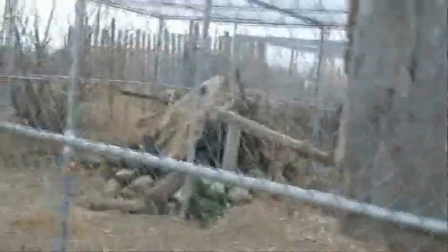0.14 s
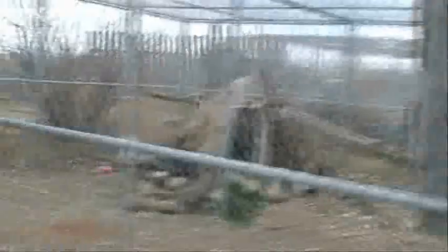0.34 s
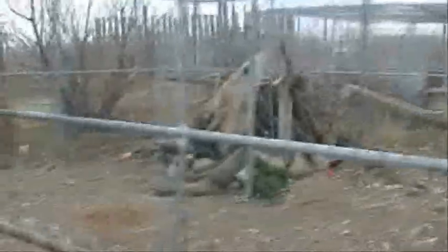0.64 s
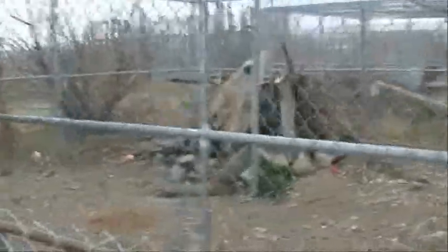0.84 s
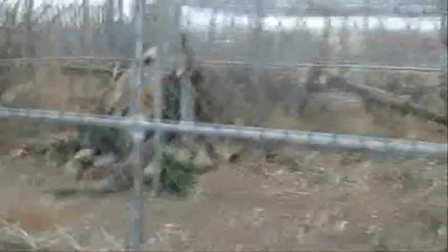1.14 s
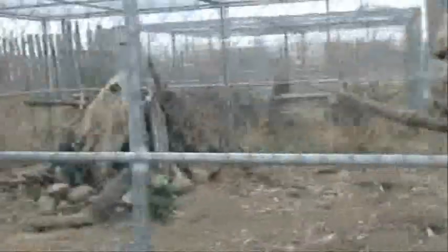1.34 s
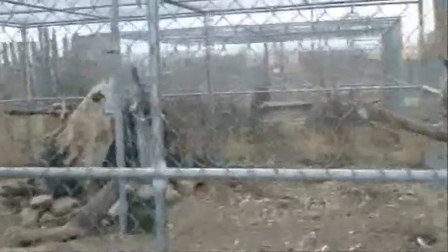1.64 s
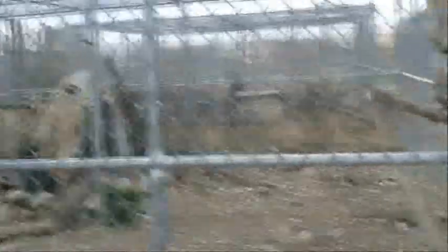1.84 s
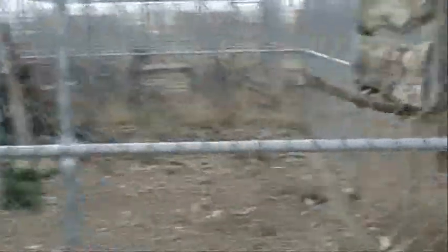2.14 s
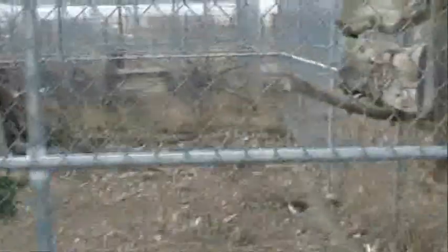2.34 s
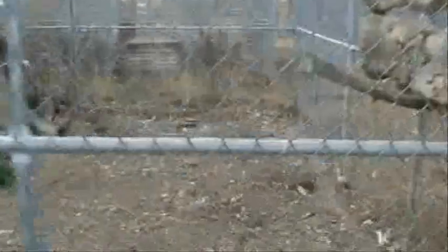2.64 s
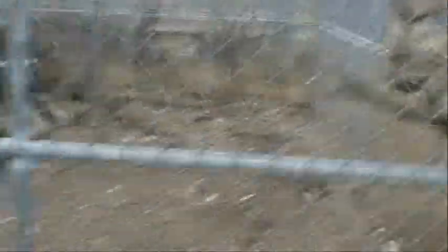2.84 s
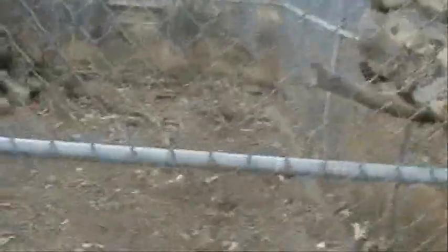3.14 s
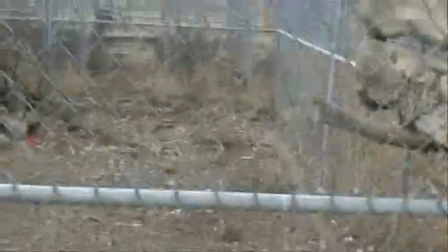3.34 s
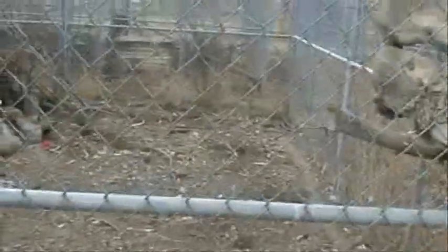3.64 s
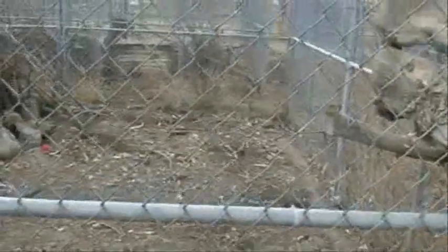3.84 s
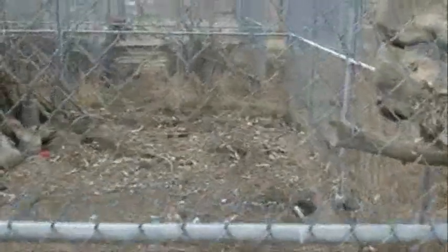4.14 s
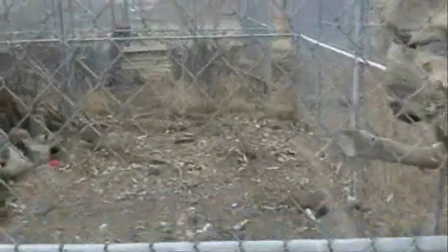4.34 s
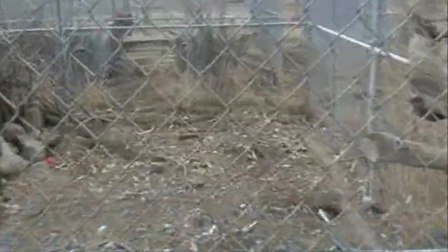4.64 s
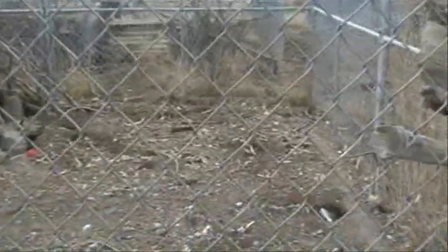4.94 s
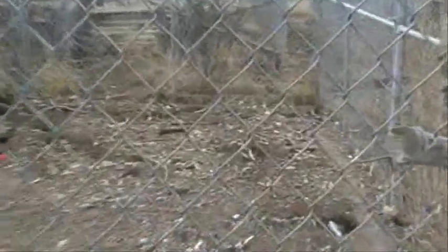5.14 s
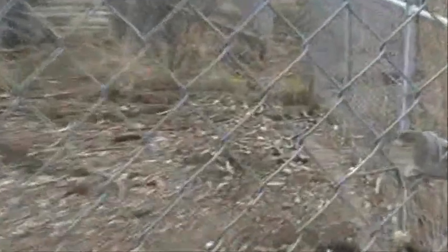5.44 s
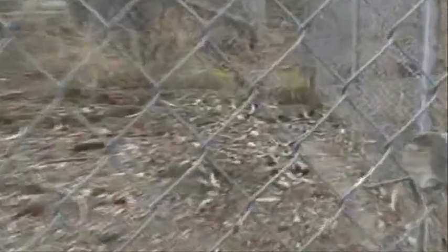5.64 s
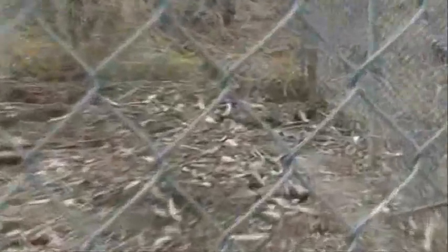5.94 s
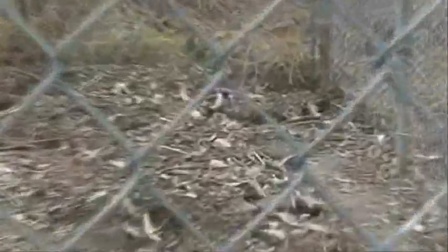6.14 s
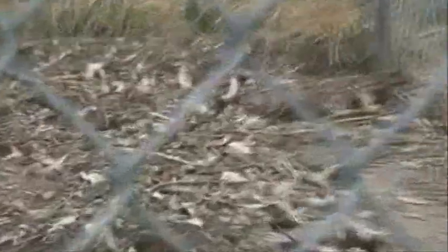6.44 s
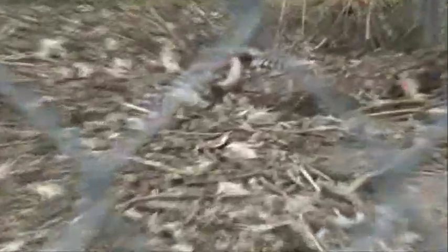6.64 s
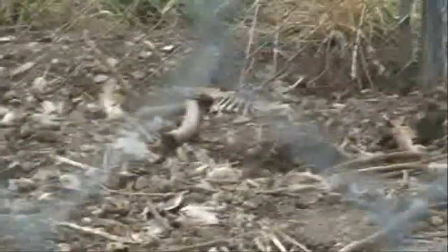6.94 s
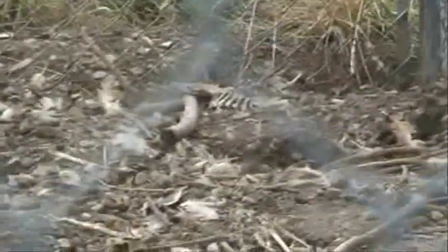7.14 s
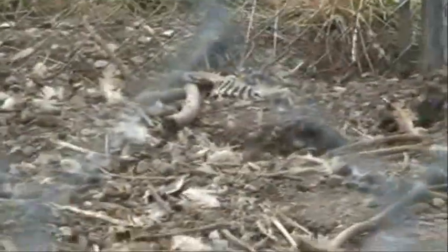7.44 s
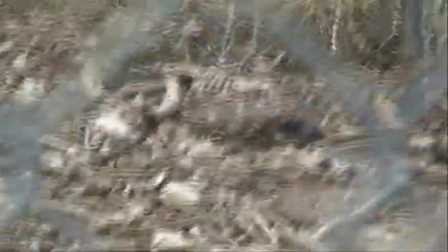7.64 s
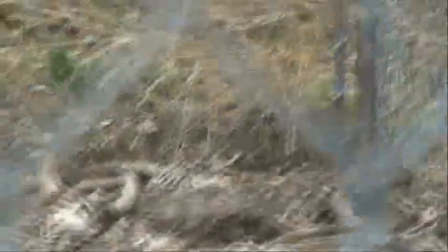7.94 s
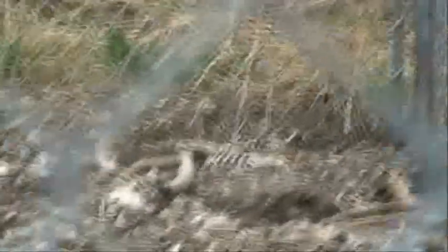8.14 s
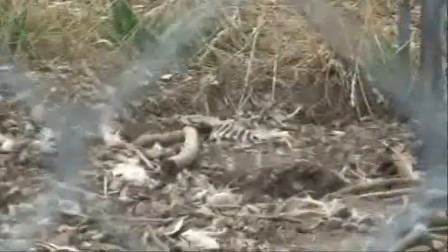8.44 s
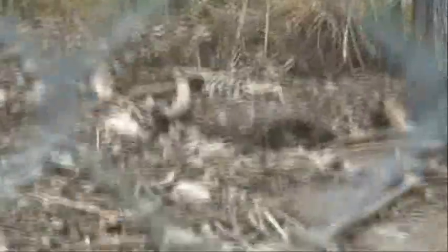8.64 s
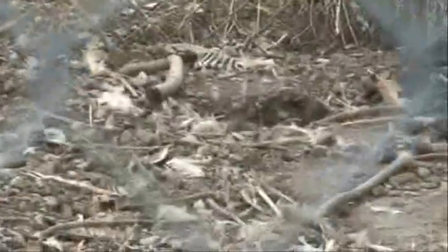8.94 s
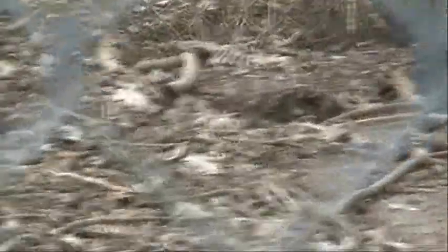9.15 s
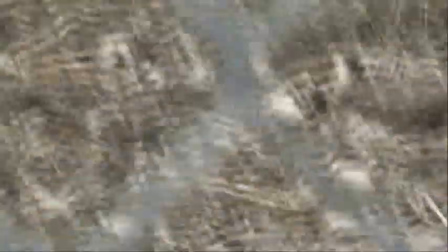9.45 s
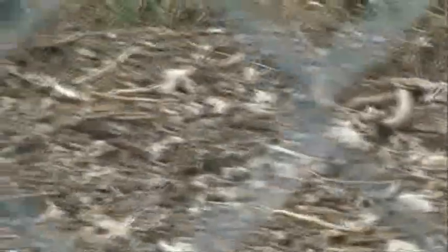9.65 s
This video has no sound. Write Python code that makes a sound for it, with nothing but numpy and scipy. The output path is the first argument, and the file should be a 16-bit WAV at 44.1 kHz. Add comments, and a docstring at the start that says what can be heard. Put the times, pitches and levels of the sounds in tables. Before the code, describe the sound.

Steady bird chatter and crisp single chirps sit above low wind, a droning far engine and a faint high rustle of dry scrub. Feet scuff litter and bump the fence, busiest around one second. Around seven seconds the wind gusts harder and foxes call: squeaky gliding whistles, then six brief yips, the strongest close together around nine seconds. The place is open, with sheds returning quick, soft echoes to a handheld stereo microphone.

```python
"""Soft knocks, scuffs and sparrow chatter come first, over rumbling wind and an engine idling far off.
Later, foxes in an outdoor pen call: thin nasal whistles, then short yips of stacked harmonics as well.
Birds are gliding tones cut into beads; foxes are sine waves whose pitch and loudness follow drawn curves.
Feet, fence, wind, traffic and rustling scrub are mostly shaped noise, the engine a stack of low tones.
Sheds and scrub send the calls and knocks back as fading noise tails."""
import sys
import numpy as np
from scipy import signal
from scipy.fft import rfft, irfft, next_fast_len
from scipy.io import wavfile
from scipy.ndimage import uniform_filter1d, map_coordinates

SR = 44100
rng = np.random.default_rng(int(sys.argv[2]) if len(sys.argv) > 2 else 0)


def generate_wav(signal):
    """Clip the signal to [-1, 1] and save it as 16-bit WAV at the path in sys.argv[1]."""
    frames = np.transpose(np.atleast_2d(signal))
    scaled = np.clip(frames, -1, 1) * 32767
    pcm = np.round(scaled).astype(np.int16)
    wavfile.write(sys.argv[1], SR, pcm)


N = 431738  # length [samples]

# In every table, a positive left-right balance means louder on the left.
# Wind between gusts: (time [s], level [dB])
BREEZE = [(0, -52.5), (1.5, -50.5), (1.77, -65), (2.2, -49), (2.8, -53), (5, -87), (5.85, -52.5),
          (6.3, -55), (6.95, -66), (7.6, -48), (8.8, -44.5), (9.0, -54), (9.79, -53)]
# Gusts: (time of the peak [s], width [s], level [dB])
GUSTS = [(1.96, 0.15, -46), (2.66, 0.11, -45), (5.24, 0.063, -51), (7.09, .07, -42), (7.39, 0.081, -41.5),
         (7.95, 0.18, -42), (8.28, 0.04, -52), (9.12, 0.074, -39.5), (9.35, .12, -43), (9.57, .06, -55)]
# Tone colour of the wind: (frequency [Hz], relative level [dB])
WIND_COLOUR = [(12, -48), (20, -15), (33, -1.5), (59, 3), (105, -1.5), (211, -19.5), (300, -19), (390, -21),
               (660, -120)]
# Tone colour of far traffic: (frequency [Hz], relative level [dB])
TRAFFIC_COLOUR = [(15, -30), (30, -1.5), (65, -2), (110, -3), (245, -6.5), (645, -6.5), (770, -6.5),
                  (932, -7.5), (1570, -8), (2300, -13.5), (2990, -19), (5060, -120)]
# Loudness of the rustling scrub: (time [s], level [dB])
RUSTLE = [(0.0, -66), (0.63, -67.5), (3.52, -62.5), (3.76, -66), (6.81, -68.5), (7.88, -65), (8.29, -63.5),
          (9.27, -66), (9.38, -64), (9.6, -68), (9.79, -66)]
# Tone colour of the rustle: (frequency [Hz], relative level [dB])
RUSTLE_COLOUR = [(3410, -64), (5800, -20), (6420, -7), (8150, -2), (11000, -1), (13000, -1.5), (14400, -8),
                 (15600, -40)]
# How alike left and right are: (frequency [Hz], likeness [-1 to 1])
ALIKE = [(60, 0.48), (180, 0.37), (550, 0.083), (1650, 0.19), (4970, 0.63), (15000, 0.78)]
# Echo of the sheds, before stretching: (frequency [Hz], time to fade by 60 dB [s])
SHEDS = [(500, 0.29), (2000, 0.54), (7000, 0.3), (14000, 0.21)]
# Far engine: (time [s], firing rate [Hz], level [dB])
ENGINE = [(0, 50.52, -48.5), (1.95, 50.6, -52), (2.18, 49.2, -60), (2.3, 47, -51), (2.55, 46.27, -46),
          (4.88, 46.43, -47.5), (5.4, 49.1, -53), (5.62, 49.7, -49), (6.52, 51.86, -51), (9.16, 51.8, -52),
          (9.3, 50.57, -51), (9.79, 50.7, -52)]
# Engine tones: (multiple of the firing rate, relative level [dB])
ENGINE_TONES = [(1, 0), (1.5, -21), (2, -15), (3, -24)]
# Distant chatter: (time [s], level [dB])
FLOCK = [(0, -47), (.35, -45), (.7, -53.5), (1.06, -42.5), (1.25, -47.5), (1.72, -49.5), (1.85, -46),
         (2.31, -48.5), (2.55, -43), (2.75, -48), (3.19, -43.5), (3.9, -49.5), (4.23, -43.5), (4.75, -52.5),
         (5.04, -42), (5.2, -47), (6.45, -46), (6.7, -49), (7.25, -44.5), (9.79, -46.5)]
# Tone colour of the chatter's blur: (frequency [Hz], relative level [dB])
SCRUB_COLOUR = [(1060, -48), (1800, -10.5), (2270, -7.5), (2840, 0), (3660, -6.5), (4780, -5), (6390, -10),
                (7000, -12), (9100, -22), (15400, -120)]
# Single near notes: (time [s], length [s], start [Hz], top [Hz], end [Hz], level [dB], left-right [dB])
SPARROWS = [(.119, 0.092, 3970, 4600, 3300, -49, -11), (.173, 0.046, 2740, 3160, 2650, -44, -9),
            (0.219, 0.059, 3490, 5240, 4740, -45, -3), (1.166, 0.029, 3290, 3520, 3240, -42.5, 12),
            (1.646, .05, 3970, 4630, 3090, -43.5, -12), (1.675, 0.05, 4340, 4620, 4050, -42, -7),
            (1.703, 0.045, 2930, 3130, 2870, -43, -8), (1.789, 0.053, 4140, 5500, 4370, -40.5, -1),
            (2.49, 0.018, 5040, 6060, 5700, -39, 3), (3.032, .042, 3600, 4300, 3820, -40, 10),
            (3.317, .04, 2890, 3320, 2500, -46, -10), (3.59, 0.03, 5100, 6170, 5630, -43.5, 1),
            (4.393, 0.07, 3300, 4223, 3870, -42, 2), (4.853, 0.028, 4330, 4540, 3840, -42, 1),
            (5.282, 0.038, 5800, 5900, 5300, -41, -1), (5.526, 0.036, 4680, 4930, 4130, -42, -8),
            (5.683, .062, 4700, 4860, 3330, -43.5, -7), (5.745, .045, 3100, 3330, 2640, -45, -8),
            (6.261, .035, 4750, 4900, 3760, -45, -7), (6.515, 0.035, 3300, 3770, 3574, -41.5, 0),
            (7.87, 0.046, 3800, 4690, 3010, -42, 7), (8.618, .049, 3520, 4790, 3640, -42.5, 6),
            (8.69, .038, 5040, 5140, 4800, -44, -9), (9.523, 0.071, 3540, 5010, 2914, -41.5, 1)]
# Shapes of two-part calls, by kind: (delay [s], length [s], start [Hz], top [Hz], end [Hz], relative level [dB])
CHIRRUPS = {"arches": [(0, .055, 3320, 5150, 2870, 0.5), (.068, .044, 2566, 3500, 2500, -3.5)],
            "falls": [(0, .038, 4120, 4700, 3430, 1), (.041, .058, 3400, 3996, 2640, -1)],
            "flicks": [(0, .03, 3450, 4780, 3720, -0.5), (.036, 0.0306, 3315, 3720, 3350, -1.7)]}
# Two-part calls: (kind, time [s], slowness [factor], pitch [factor], level [dB], left-right [dB])
PAIRS = [("flicks", .39, 0.97, 1.01, -36.5, 7), ("falls", 1.056, 1.03, 0.97, -29.5, .1),
         ("flicks", 2.268, 1.01, 0.96, -40, 8.7), ("arches", 2.509, .88, 1, -33, 5),
         ("arches", 3.086, 1.01, 1.01, -30, 6), ("arches", 3.608, 1.06, 1.01, -33, 4.2),
         ("falls", 4.202, .9, 1.02, -31.5, 5.2), ("arches", 5.02, .99, 0.97, -38, 8.2),
         ("falls", 5.852, 1, 0.96, -39, 11)]
# Scuffs of feet on dry litter: (time [s], length [s], centre [Hz], level [dB], left-right [dB])
SCUFFS = [(.02, 0.054, 895, -50.5, -14), (.46, 0.096, 920, -54, -11), (0.895, 0.12, 890, -43.5, 2),
          (1.329, 0.21, 1650, -50, -7), (1.769, 0.065, 1820, -46, -9.5), (1.981, 0.041, 1680, -49.5, -12),
          (2.171, 0.058, 1680, -45.5, -10), (2.382, 0.12, 1660, -50, -9), (2.902, 0.11, 1160, -52, -7),
          (3.121, 0.11, 1320, -48, 0), (4.103, 0.11, 1500, -57, -2), (5.017, 0.16, 1390, -47, -7),
          (6.778, 0.1, 1470, -49.5, -6), (8.466, 0.29, 1260, -47, -7), (9.082, 0.071, 690, -48, -5),
          (9.678, 0.085, 885, -43.5, -4)]
# Knocks: (time [s], level [dB], pitch [Hz], time to fade by 60 dB [s], left-right [dB])
KNOCKS = [(.016, -40, 1100, .02, -6), (.043, -43.5, 566, .028, -15), (.065, -37, 935, 0.026, -6),
          (.455, -44, 760, .027, -1), (.732, -44, 1360, 0.023, -5), (.909, -25.5, 420, 0.015, 1.5),
          (.948, -33, 613, 0.059, .1), (.989, -22, 1900, .009, 4), (1.143, -37, 480, .022, 3),
          (1.325, -43, 830, 0.026, 5), (1.37, -37, 643, 0.014, 5), (1.926, -43, 1130, .025, 2),
          (2.579, -35, 590, 0.042, -1), (2.621, -27, 1050, .013, .1), (2.801, -37.5, 1260, 0.034, -8),
          (2.975, -38, 1270, 0.024, 11), (3.105, -40, 860, 0.065, 1), (3.31, -34.5, 1160, 0.017, -8),
          (3.399, -35, 1200, 0.038, -11), (4.074, -44, 1184, .017, -9), (4.313, -37, 450, 0.029, 4),
          (4.833, -46, 759, 0.022, -14), (4.925, -41.5, 1210, 0.018, -5), (5.319, -42.5, 1190, 0.0098, -4),
          (6.782, -39.5, 1160, 0.017, -8), (6.932, -19.5, 1330, .018, -9.5), (7.007, -40, 1100, 0.039, -8),
          (9.147, -39, 529, 0.031, -2)]
# Bright ticks, some alone and some the sharp edge of a knock: (time [s], level [dB], left-right [dB])
TICKS = [(0.4747, -41, -2), (.909, -30, 2), (.948, -30.5, .1), (1.144, -35.5, 0), (2.975, -37, 9),
         (3.288, -39, 4), (3.309, -39, -9), (4.074, -37.5, -10), (4.1318, -34, -.5), (4.2337, -33.5, 3),
         (4.6179, -44, -7), (4.925, -40.5, -7), (5.319, -39, -4), (6.953, -48, -4), (7.5432, -30.5, 1),
         (8.6515, -31.5, -3), (9.0992, -31.5, -3), (9.6014, -35, 5)]
# Yips: (time [s], pitch [Hz], level of 1st harmonic [dB], mouth opening: 2nd harmonic over 1st [dB])
YIPS = [
    [(7.337, 960, -34, -14), (7.344, 1000, -26, -16), (7.358, 1045, -19.5, -10), (7.383, 1095, -27, -9),
     (7.39, 1090, -53, -9)],
    [(7.651, 725, -48, -7), (7.657, 758, -19.5, -16), (7.686, 916, -13.5, -5.5), (7.7, 860, -27, -13),
     (7.709, 870, -40, -16)],
    [(8.023, 641, -39, -8), (8.039, 603, -34, -17), (8.061, 771, -21.5, -12), (8.089, 831, -29, -1.5),
     (8.108, 740, -45.5, 5)],
    [(8.891, 1033, -47, -18), (8.904, 959, -19, -10.5), (8.925, 1035, -15, -7.5),
     (8.942, 1060, -10.5, -19.5), (8.954, 1225, -13, -30), (8.966, 1297, -19, -18), (8.975, 1113, -39, -6)],
    [(9.22, 973, -27, -9), (9.23, 1078, -21, -16), (9.244, 1240, -20.5, 2.5), (9.266, 1416, -11, -8),
     (9.282, 1430, -8.5, -13), (9.29, 1348, -18.5, 0.4), (9.323, 1094, -18.5, -1.5), (9.338, 914, -25, 0.5),
     (9.372, 882, -35, -20)],
    [(9.617, 762, -32, 0), (9.623, 690, -33.5, -6), (9.648, 754, -22, -9), (9.658, 800, -27.5, -11),
     (9.69, 704, -39.5, -11)],
]
# 3rd harmonic of a yip against the 2nd: (frequency [Hz], relative level [dB])
THIRD = [(2200, -5.5), (3000, -9), (3600, -11.5), (4300, -19)]
# Higher harmonics of a yip against the 3rd: (frequency [Hz], relative level [dB])
THROAT = [(3000, -6), (4500, -11), (6000, -17), (7500, -25), (10000, -38)]
# Tone colour of air in the throat: (frequency [Hz], relative level [dB])
BREATH = [(500, -23), (1500, -5.5), (3500, 2), (6000, -3), (8500, -13), (11000, -19), (14000, -24)]
# Whistles: (time [s], pitch [Hz], level [dB])
WHISTLES = [
    [(2.616, 5770, -42), (2.638, 6200, -40), (2.69, 6330, -59)],
    [(2.862, 6100, -45), (2.9, 6100, -56), (2.925, 6250, -64), (2.941, 6500, -51), (2.965, 6640, -56)],
    [(7.024, 6430, -48), (7.04, 6550, -33), (7.074, 6745, -17.5), (7.101, 6870, -30.5),
     (7.113, 6470, -23.5), (7.129, 6400, -31), (7.163, 6190, -29), (7.18, 6255, -51), (7.223, 6840, -58),
     (7.269, 6540, -68)],
    [(7.285, 6100, -47), (7.315, 6510, -17), (7.333, 6950, -35), (7.351, 8000, -21), (7.362, 8370, -33),
     (7.374, 7960, -16.5), (7.384, 7240, -15), (7.394, 6840, -22), (7.459, 6530, -28), (7.475, 6300, -38),
     (7.495, 6550, -26), (7.509, 6342, -38), (7.55, 6400, -71)],
    [(7.644, 6760, -32), (7.689, 7300, -29), (7.703, 6980, -23), (7.738, 7060, -49), (7.752, 7120, -37.5),
     (7.859, 6320, -32.5), (7.887, 6420, -48), (7.92, 6470, -62)],
    [(8.04, 7670, -44), (8.062, 8250, -51), (8.077, 8450, -42), (8.14, 7260, -53.5), (8.205, 6800, -49),
     (8.229, 6660, -50)],
    [(8.268, 5870, -41), (8.289, 5690, -48)],
    [(8.375, 6280, -42), (8.393, 6440, -37), (8.446, 6400, -55), (8.5, 6450, -49), (8.531, 6900, -39),
     (8.56, 6650, -67)],
    [(8.665, 5850, -52), (8.739, 6600, -50)],
    [(8.852, 6210, -51), (8.876, 6680, -32), (8.89, 6550, -54)],
    [(8.961, 7600, -33), (8.975, 6930, -29), (9.012, 6880, -42), (9.021, 6870, -39), (9.09, 5840, -44.5)],
    [(9.2, 6430, -56), (9.213, 6406, -42), (9.229, 6910, -53)],
    [(9.345, 6200, -38), (9.4, 6360, -49), (9.475, 6220, -57)],
    [(9.64, 7430, -57), (9.661, 6860, -25), (9.677, 6510, -46), (9.731, 6650, -43), (9.745, 6550, -55)],
]
# Change in the whistle's upper octave: (frequency of the octave [Hz], change [dB])
OCTAVE_FADES = [(11500, -18), (12500, -2), (13500, -4.5), (14200, -14), (15500, -40)]

TRAFFIC_DB, FLOCK_PAN_DB, FOX_PAN_DB = -53.5, -3, -8.5
KNOCK_TICK_DB = -27  # bright edge, relative to its knock
OCTAVE_DB, OCTAVE_TOP_DB = -10, -42.5  # octave relative to the whistle; its cap before OCTAVE_FADES
CEILING, TOP_HZ = .95, 15700  # largest rounded value; the sound holds nothing above TOP_HZ


def amp(db):
    """Turns decibels into a multiplier."""
    return 10 ** (np.asarray(db) / 20)


def unit(x):
    """Scales a sound to an rms of 1."""
    return x / np.sqrt(np.mean(x ** 2) + 1e-20)


def along(points, hz):
    """Reads (frequency [Hz], value) points on a logarithmic frequency axis."""
    f, value = np.transpose(points)
    return np.interp(np.log(hz + 1), np.log(f + 1), value)


def curves(rows):
    """Draws one value per sample for each column after the time."""
    s, *columns = np.transpose(rows)
    return [np.interp(np.arange(N) / SR, s, column) for column in columns]


def calls(tables, fade):
    """Joins the curves of several calls and makes a soft gate that is open during them."""
    gate = np.zeros(N)
    for rows in tables:
        start, end = int(rows[0][0] * SR), int(rows[-1][0] * SR) + 40
        gate[start:end] = 1
    all_rows = sorted(row for rows in tables for row in rows)
    return np.abs(uniform_filter1d(gate, int(fade * SR))), curves(all_rows)


def wobble(rate):
    """Draws a smooth random curve with this many random points a second."""
    points = rng.standard_normal(int(N * rate / SR) + 4)
    return map_coordinates(points, [np.arange(N) * rate / SR])


def filtered(x, response):
    """Reshapes a sound by multiplying its spectrum by a response."""
    size = next_fast_len(x.shape[-1] + 2048)
    spectrum = rfft(x, size) * response(np.fft.rfftfreq(size, 1 / SR))
    return irfft(spectrum, size)[..., :x.shape[-1]]


def sides(pan_db):
    """Gives left and right gains that differ by pan_db."""
    return amp([[pan_db / 2], [-pan_db / 2]])


def add(out, s, x, pan_db):
    """Adds a sound at a time and a place between left and right."""
    part = out[:, int(max(s, 0) * SR):][:, :len(x)]
    part += x[:part.shape[1]] * sides(pan_db)


def rush(spectrum, alike, patchy_db):
    """Makes stereo noise whose gain is patchy in time and pitch; its middle has rms 1."""
    z = signal.stft(rng.standard_normal((2, N)), nperseg=512)[2]
    across_pitch = uniform_filter1d(rng.standard_normal(z.shape[1:]), 6, 0)
    patches = amp(patchy_db * unit(uniform_filter1d(across_pitch, 10, 1)))
    pair = signal.istft(z * patches, nperseg=512)[1][:, :N]

    def middle_and_side(hz):
        # This split of energy gives left and right the wanted likeness.
        angle = np.arccos(np.clip(along(alike, hz), -1, 1)) / 2
        return amp(along(spectrum, hz)) * [np.cos(angle), np.sin(angle)]

    mid, side = filtered(pair, middle_and_side)
    return np.array([mid + side, mid - side]) / mid.std()


def echoes(x, stretch, piece=.45):
    """Answers from sheds and scrub: each piece [s] of sound gets a new fading noise tail."""
    out, step = np.zeros((2, N + 2 * SR)), int(piece * SR)
    for at in range(0, N, step):
        hz, t, z = signal.stft(rng.standard_normal((2, SR // 2)), SR, nperseg=256)
        fade = amp(-60 * t / (stretch * along(SHEDS, hz)[:, None]))
        tail = signal.istft(z * fade, SR, nperseg=256)[1]
        tail /= np.linalg.norm(tail[0])
        wet = signal.fftconvolve(x[None, at:at + step], tail, axes=1)
        out[:, at + 500:][:, :wet.shape[1]] += wet  # starts 500 samples late
    return out[:, :N]


def wind():
    """Low wind rumble on both microphone ports: lumpy noise, with separate lumps on each side."""
    t = np.arange(N) / SR
    strength = amp(curves(BREEZE)[0])
    for s, width, db in GUSTS:
        strength += amp(db) * np.exp(-((t - s) / width) ** 2)
    lumps = amp(2.6 * np.array([wobble(11), wobble(15)]))
    noise = rush(WIND_COLOUR, [(30, 0.68), (70, -0.35)], patchy_db=1.5)
    return strength * unit(lumps * noise)


def traffic():
    """Far traffic blends into a wide, nearly steady noise."""
    return amp(TRAFFIC_DB + 0.14 * wobble(2.99)) * rush(TRAFFIC_COLOUR, ALIKE, patchy_db=4.0)


def rustle():
    """Dry scrub hisses as high noise that gently swells and fades."""
    level_db = curves(RUSTLE)[0] + 1.2 * wobble(5)
    return amp(level_db) * rush(RUSTLE_COLOUR, ALIKE, patchy_db=2.5)


def engine():
    """Tones tied to the firing rate make an idling drone, with a faint whine near 780 Hz."""
    hz, db = curves(ENGINE)
    phase = 2 * np.pi * np.cumsum(hz + 0.45 * wobble(9)) / SR
    tones = sum(amp(level) * np.sin(k * phase) for k, level in ENGINE_TONES)
    drone = np.sqrt(2) * amp(db + 1.8 * wobble(7.7)) * tones
    whine = amp(-65) * np.sin(2 * np.pi * np.cumsum(780 + 25 * wobble(60)) / SR)
    return (drone + whine) * sides(1.2)


def chirp(length, start_hz, top_hz, end_hz, burr_hz):
    """One bird note climbs, drops quickly and levels out, while a fast burr breaks it into beads."""
    u = np.arange(int(length * SR)) / (length * SR)  # 0 to 1 through the note
    rise = np.abs(np.log(top_hz / start_hz)) + 0.012
    fall = np.abs(np.log(top_hz / end_hz)) + 0.0073
    top = np.clip(1.1 * rise / (rise + fall), .1, .9)
    bend, bend_hz = top + 0.4006 * (1 - top), .45 * top_hz + .55 * end_hz
    hz = np.interp(u, [0, top, bend, 1], [start_hz, top_hz, bend_hz, end_hz])
    burr = 2 * np.pi * burr_hz * length * (u + 0.16 * u * u)  # the burr speeds up
    zigzag = 1 + .045 * np.sin(burr / 3) + .015 * np.sin(burr)  # makes the pitch waver as it glides
    phase = 2 * np.pi * np.cumsum(uniform_filter1d(hz, 120) * zigzag) / SR
    beads = 1 + .55 * np.cos(burr + 1.2)
    return np.sin(np.pi * u) ** 0.28 * beads * np.sin(phase)


def flock(count=800):
    """Many quick far bird notes mix with their echoes and a blur of noise."""
    out = np.zeros((2, N))
    for when in rng.random(count):
        pitch, size, climb, drop, loud, pan, burr = rng.standard_normal(7)
        top_hz, length = 4300 * np.exp(.13 * pitch), .032 * np.exp(.3 * size)
        start_hz = top_hz * np.exp(-(.05 + .15 * abs(climb)))
        end_hz = top_hz * np.exp(-(.1 + .2 * abs(drop)))
        note = chirp(length, start_hz, top_hz, end_hz, 170 * np.exp(0.287 * burr))
        add(out, when * N / SR, amp(2.36 * loud) * note, 3 * pan)
    direct_db, blur_db = 0.5, -7
    notes = amp(direct_db) * unit(out) + unit(echoes(out.mean(0), stretch=1.0))
    blur = rush(SCRUB_COLOUR, ALIKE, patchy_db=2.5)
    level = amp(curves(FLOCK)[0] + 1.15 * wobble(4))
    return sides(FLOCK_PAN_DB) * level * (unit(notes) + amp(blur_db) * blur)


def sparrows():
    """Near birds sing single gliding notes and two-part calls built from a few shared shapes."""
    notes = []
    for kind, s, slow, pitch, db, pan_db in PAIRS:
        for delay, length, *hz, note_db in CHIRRUPS[kind]:
            notes.append((s + slow * delay, slow * length, *(pitch * np.array(hz)), db + note_db, pan_db))
    out = np.zeros((2, N))
    for s, length, start_hz, top_hz, end_hz, db, pan_db in notes + SPARROWS:
        burr_hz = 190 * np.exp(0.18 * rng.standard_normal())
        add(out, s, amp(db) * chirp(length, start_hz, top_hz, end_hz, burr_hz), pan_db)
    return out * amp(2.13 * wobble(90))


def scuffs():
    """Litter crackles under a paw: swells of grainy noise in a dull band with a thin bright edge."""
    out = np.zeros((2, N))
    for s, length, hz, db, pan_db in SCUFFS:
        u = np.arange(int(length * SR)) / (length * SR)
        crackle = unit(uniform_filter1d(rng.standard_normal(len(u)), 150))
        grains = rng.standard_normal(len(u)) * amp(6 * crackle)

        def dull_band(f):
            peak = f * hz / np.abs(hz * hz - f * f + 1j * f * hz * 1.52)
            return peak ** 2 + amp(-37.0)

        swell = np.sin(np.pi * u) ** 0.25
        add(out, s, amp(db) * swell * unit(filtered(grains, dull_band)), pan_db)
    return out


def tick(db):
    """A tick is a few milliseconds of bright noise with a sharp start and a quick fade."""
    t = np.arange(SR // 40) / SR
    colour = [(2500, -2.5), (6000, -1.5), (13500, -10.5), (15500, -17)]
    bright = filtered(rng.standard_normal(len(t)), lambda f: amp(along(colour, f)))
    return unit(bright) * amp(db - 60 * t / 0.023) * (1 - np.exp(-t / 0.00051))


def ticks(count=60):
    """Bright ticks, some alone and some the sharp edge of a knock, with faint ones scattered at random."""
    out = np.zeros((2, N))
    for s, db, pan_db in TICKS:
        add(out, s, tick(db), pan_db)
    for when in rng.random(count):
        loud, pan = rng.standard_normal(2)
        add(out, when * N / SR, tick(-56 + 3 * loud), 3 * pan)
    return out


def knocks():
    """Feet and fence ring briefly at a pitch, after a soft lead-in, with a slower, weaker rattle."""
    out, t = np.zeros((2, N)), np.arange(SR // 8) / SR
    late = t - .0025  # time from the hit [s]
    for s, db, hz, t60, pan_db in KNOCKS:
        def ring_band(f):
            peak = f * hz / np.abs(hz * hz - f * f + 1j * f * hz)
            return peak / (1 + (f / 4000) ** 2) / (1 + (.55 * hz / (f + 1)) ** 4)

        band = unit(filtered(rng.standard_normal(len(t)), ring_band))
        shape = amp(np.where(late < 0, 8000 * late, -60 * late / t60))
        ring = (np.sin(2 * np.pi * hz * late) + 0.53 * band) * shape
        rattle = band * amp(-13 - 60 * t / (4 * t60))
        # The contact itself is brighter and very short.
        snap = amp(-2.5 - 9000 * np.abs(late)) * np.sin(2 * np.pi * 2.1 * hz * late)
        add(out, s, amp(db) * (ring + snap + rattle), pan_db)
        add(out, s, tick(db + KNOCK_TICK_DB), pan_db)
    return out


def yips():
    """Vocal folds make stacked harmonics and puffs of breath; also returns their gate and phase."""
    voiced, (hz, db1, open_db) = calls(YIPS, fade=.007)
    db2 = db1 + open_db
    db3 = db2 + along(THIRD, 3 * hz)
    phase = 2 * np.pi * np.cumsum(hz * (1 + .011 * wobble(300))) / SR
    levels = [db1, db2, db3] + [db3 + along(THROAT, k * hz) for k in range(4, 9)]
    yip = amp(db1 - 37.5) * np.sin(phase / 2)  # a faint tone an octave down
    for k, db in enumerate(levels, 1):
        grain_db = (.9 * k - .1) * wobble(200)  # higher harmonics break up more
        yip += amp(db + grain_db) * np.sin(k * phase + 1.07 * k)
    breath = unit(filtered(rng.standard_normal(N), lambda f: amp(along(BREATH, f))))
    yip += amp(db1 - 26.5) * (1 + np.sin(phase)) * breath  # air puffs out once a cycle
    return voiced * yip, voiced, phase


def whistles(voiced, yip_phase):
    """A second, nasal oscillator whistles; a yip shakes its phase and so adds sidebands."""
    blown, (hz, db) = calls(WHISTLES, fade=0.0036)
    octave_db = np.minimum(db + OCTAVE_DB, OCTAVE_TOP_DB) + along(OCTAVE_FADES, 2 * hz)
    phase = 2 * np.pi * np.cumsum(hz * (1 + .004 * wobble(250))) / SR
    phase += .35 * voiced * np.sin(yip_phase)
    rasp = amp(-15) * wobble(1800)  # turbulence spreads noise round both tones
    whistle = amp(db) * (1 + rasp) * np.sin(phase)
    whistle += amp(octave_db) * (1 + 3.1 * rasp) * np.sin(2 * phase)
    colour = [(6000, -40), (9500, -12), (12500, 0), (15000, -12)]
    spray = unit(filtered(rng.standard_normal(N), lambda f: amp(along(colour, f))))
    whistle += amp(db - 32 + 5 * voiced) * spray  # more hiss while both voices sound
    return blown * amp(2.2 * wobble(110)) * whistle


def foxes():
    """Yips and whistles add together, each from its own oscillator."""
    yip, voiced, phase = yips()
    return np.sqrt(2) * (yip + whistles(voiced, phase))


def scene():
    """Mixes the background, the near sounds, the foxes and the echoes."""
    background = wind() + traffic() + rustle() + engine() + flock()
    near = sparrows()
    steps = scuffs() + knocks() + ticks()
    fox = foxes()
    fox_sides = sides(FOX_PAN_DB)
    direct = fox * fox_sides / fox_sides.mean() + near + steps
    fox_echo = amp(-17.0) * echoes(fox, stretch=0.83) * amp([[-2], [2.1]])
    near_echo = amp(-11.5) * echoes((near + 0.7 * steps).mean(0), stretch=0.98)
    return background + direct + fox_echo + near_echo


def record(dry):
    """Peaks just under full scale are rounded off; the sound holds nothing above TOP_HZ."""
    rounded = dry / (1 + np.abs(dry / CEILING) ** 6) ** (1 / 6)
    return filtered(rounded, lambda hz: hz < TOP_HZ)


dry = scene()
out = record(dry)
generate_wav(out)
```